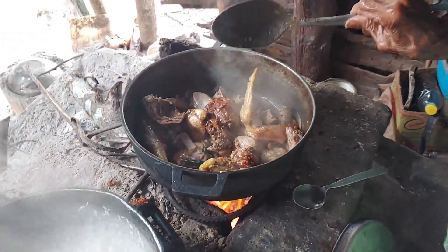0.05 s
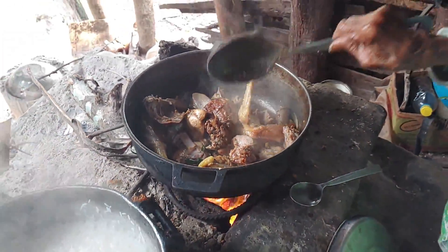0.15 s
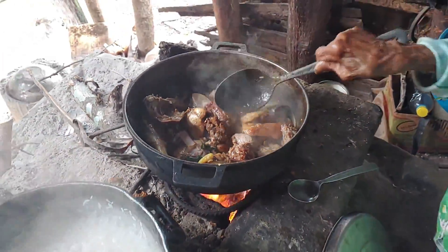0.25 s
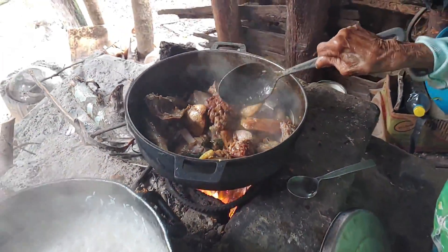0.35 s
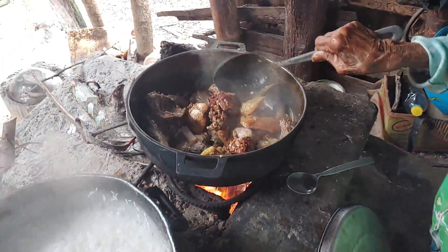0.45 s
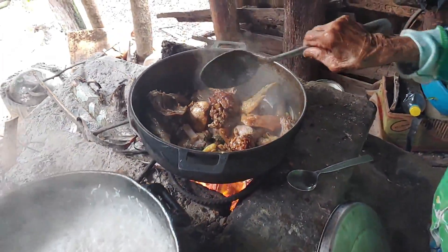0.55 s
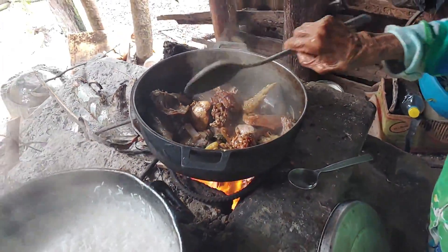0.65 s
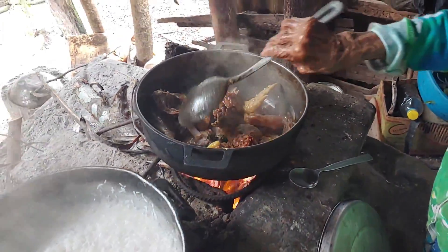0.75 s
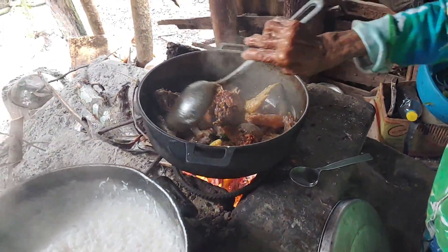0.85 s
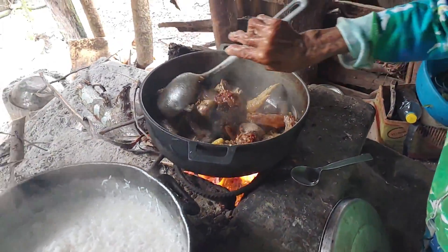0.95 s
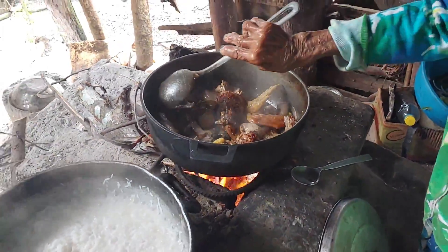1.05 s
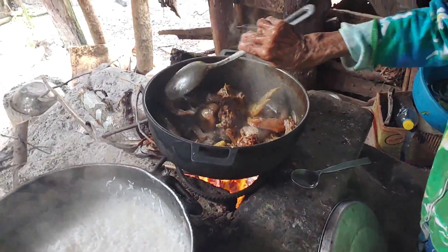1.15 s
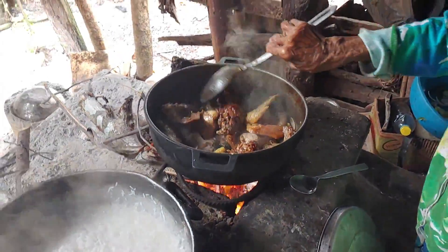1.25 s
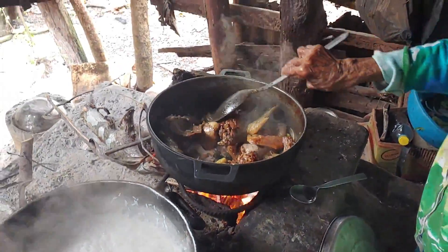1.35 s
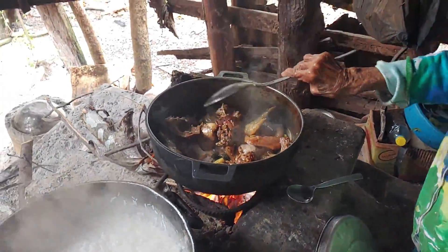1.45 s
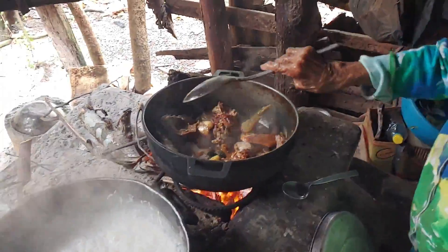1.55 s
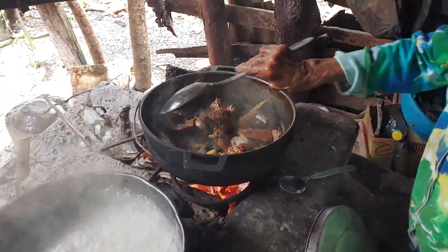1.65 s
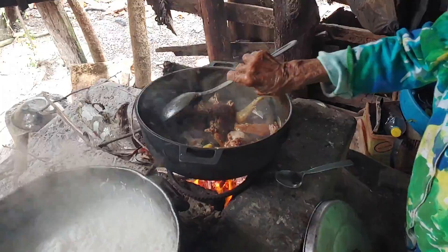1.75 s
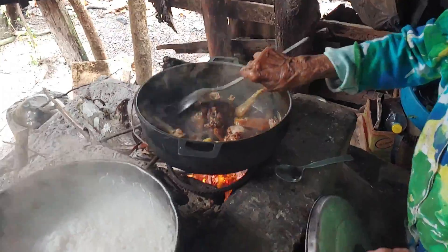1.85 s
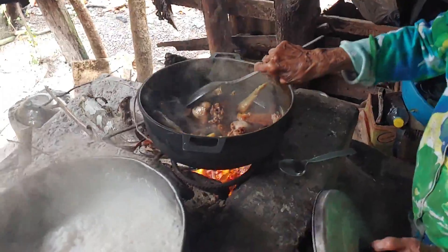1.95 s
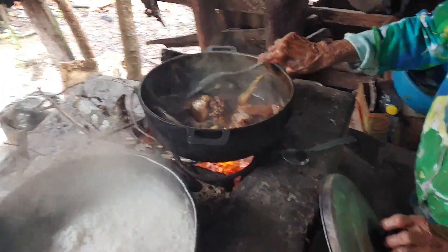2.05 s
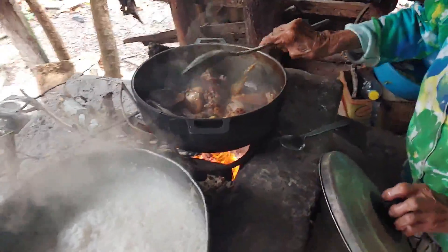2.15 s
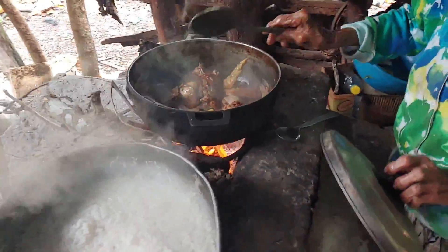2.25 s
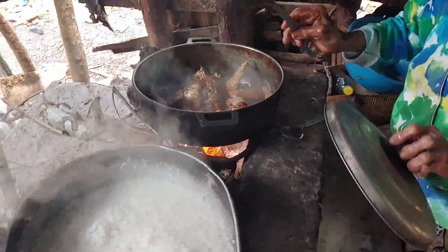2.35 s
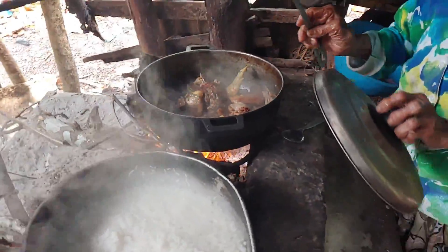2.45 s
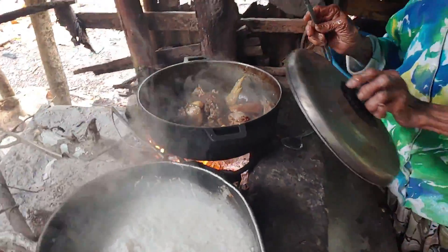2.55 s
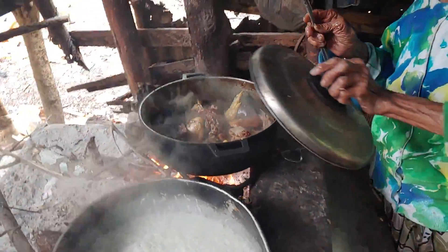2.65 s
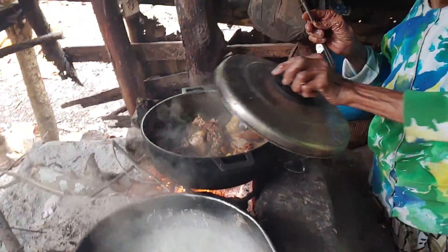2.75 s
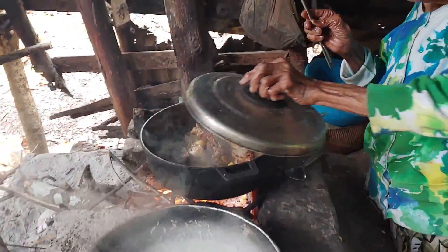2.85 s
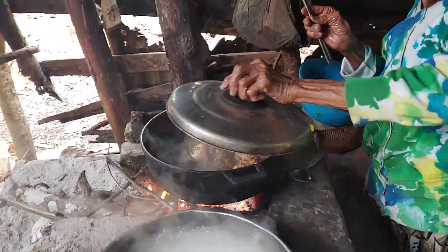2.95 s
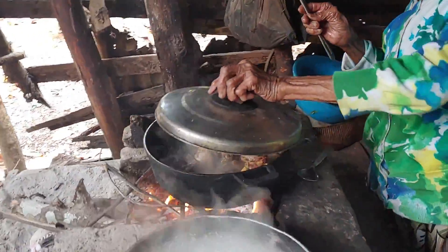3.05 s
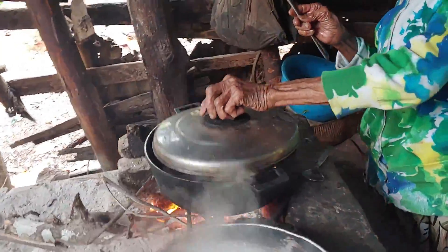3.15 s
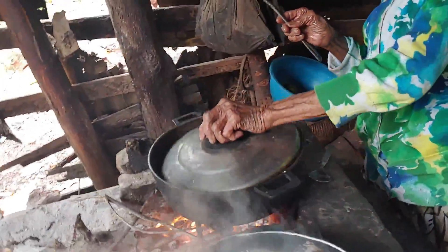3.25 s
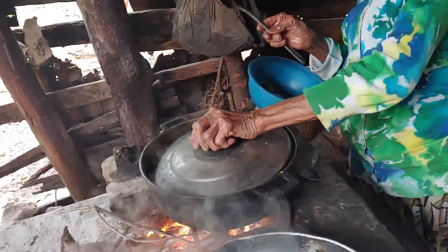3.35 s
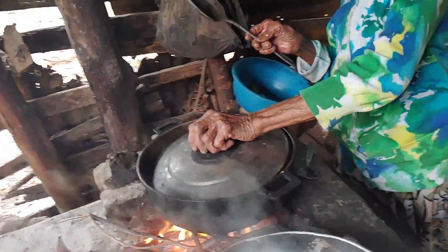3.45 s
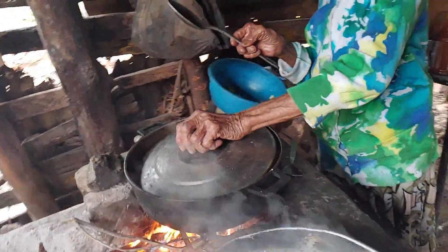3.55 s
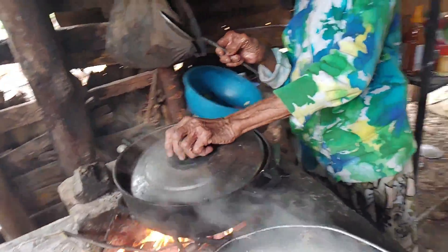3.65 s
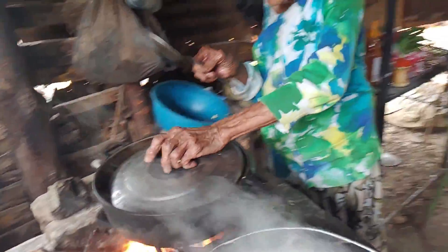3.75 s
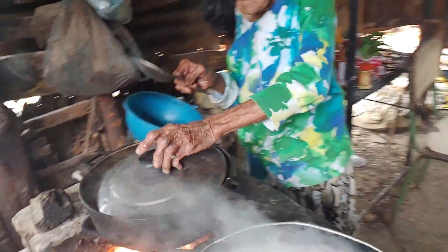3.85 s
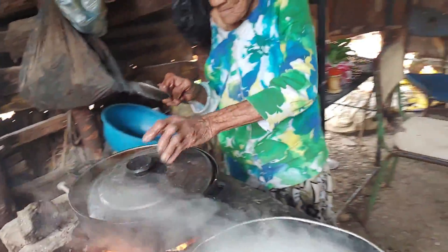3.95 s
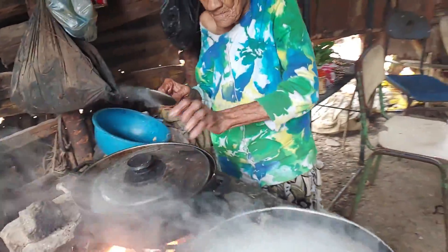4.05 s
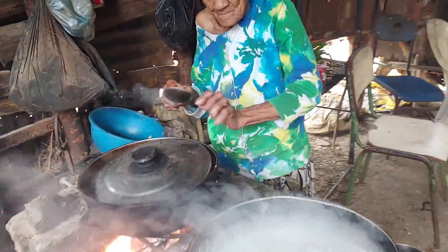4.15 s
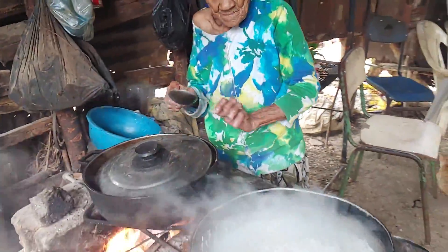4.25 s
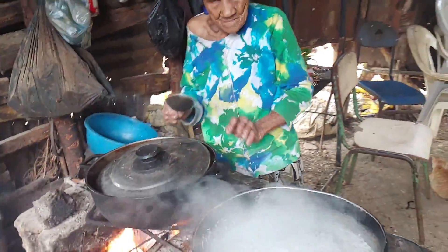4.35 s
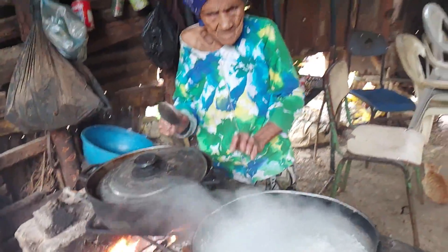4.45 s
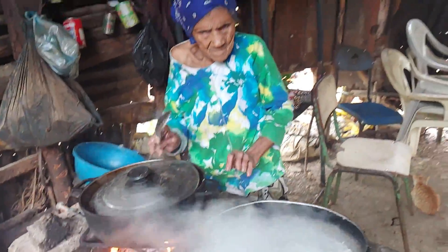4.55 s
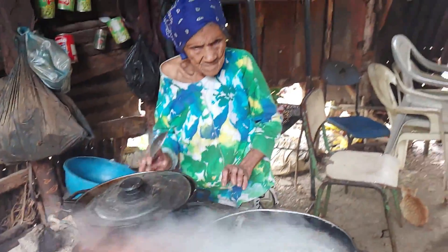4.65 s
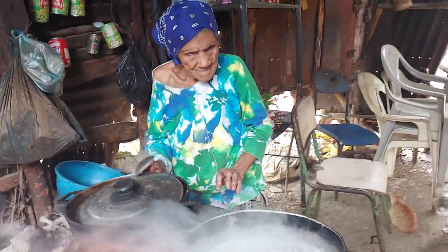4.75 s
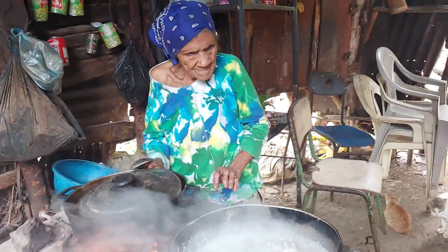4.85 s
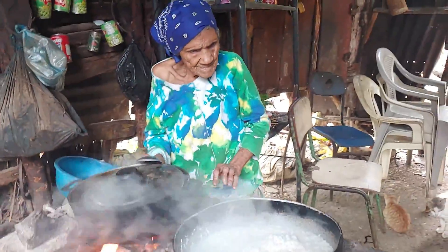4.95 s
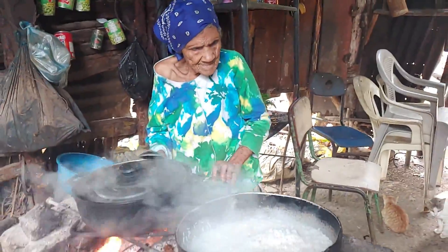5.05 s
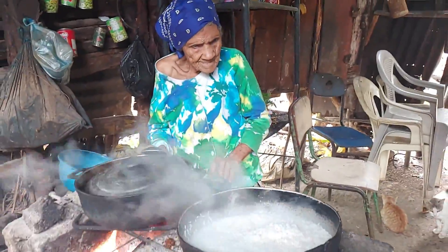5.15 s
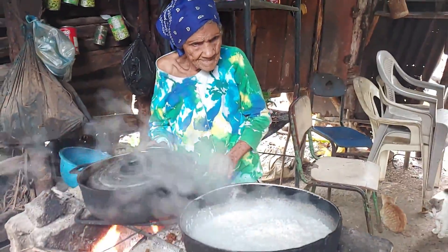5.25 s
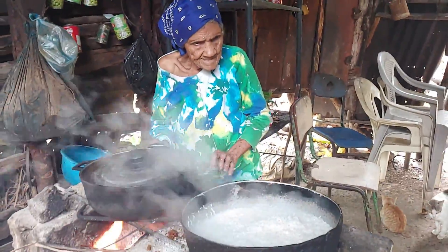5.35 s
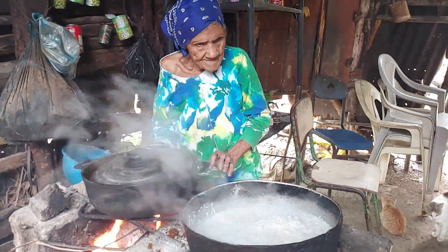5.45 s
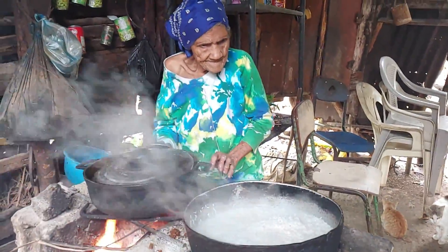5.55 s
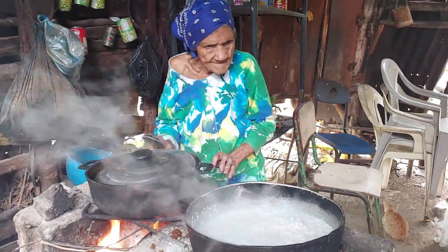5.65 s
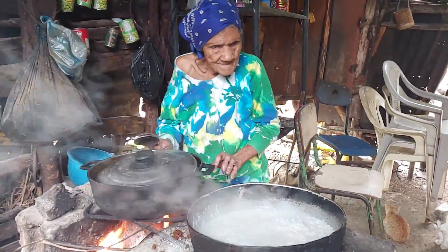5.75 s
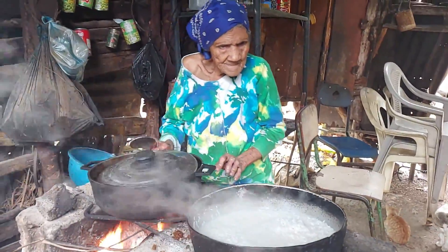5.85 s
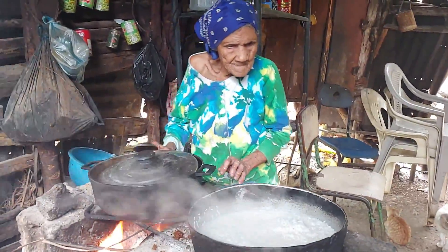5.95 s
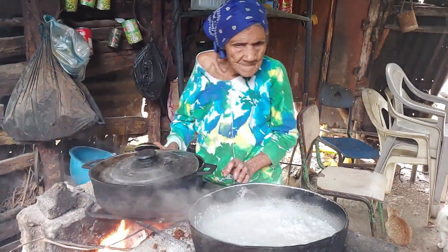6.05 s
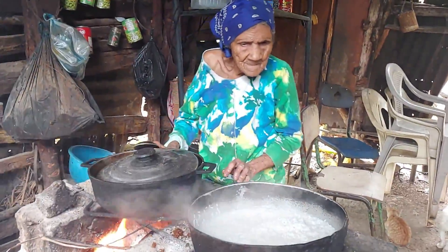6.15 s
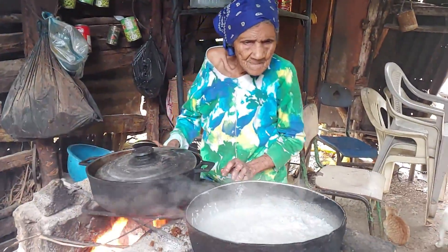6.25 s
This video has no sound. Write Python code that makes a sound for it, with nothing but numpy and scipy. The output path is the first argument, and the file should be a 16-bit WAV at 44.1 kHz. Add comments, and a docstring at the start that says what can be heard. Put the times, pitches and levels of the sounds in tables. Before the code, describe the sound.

A metal spoon taps and scrapes gently in a cast pot, heard up close over quiet frying, a rumbling wood fire and a low hum in an open shed. Halfway through, the lid clatters loudly into place and the sizzle dips slightly. One sharp ringing knock of the spoon follows, then bright clinks, a short juddering scrape and a final clank, as a faint far tone begins.

```python
"""Fat sizzles and a wood fire rumbles and crackles in an open shed, over a low distant hum.
A metal spoon stirs meat in a cast pot with dull taps and light scrapes; the lid drops on and rattles
to rest. The spoon is knocked on the covered pot, put down, slid along and let go with a last clank,
as a faint far tone sets in. Each metal hit is ringing modes and a noisy clatter over a hollow thump;
the sizzle is a stream of tiny bursts, the fire fluttering low noise."""
import sys
import numpy as np
from scipy.fft import rfft, irfft, next_fast_len
from scipy.io import wavfile
from scipy.ndimage import map_coordinates

SR = 44100
rng = np.random.default_rng(int(sys.argv[2]) if len(sys.argv) > 2 else 0)


def unload_audio(sound):
    """Save the sound as a 16-bit wav file, at the path given as the first command line argument."""
    columns = np.transpose(np.atleast_2d(sound))
    # keep every value between -1 and 1, then stretch to whole-number steps
    steps = np.round(np.clip(columns, -1, 1) * 32767)
    wavfile.write(sys.argv[1], SR, steps.astype(np.int16))


N = 278041
TIME = np.arange(N) / SR
RING_TIME = np.arange(SR // 3) / SR  # time axis of one hit

# stereo image, narrow in the bass and wide above: f/Hz, left-right correlation
STEREO_LIKENESS = [(30, 0.87), (120, 0.92), (280, 0.96), (580, 0.49), (1240, 0.35), (3000, -0.34),
                   (6000, 0.18), (9000, -0.014)]
# thump of the hearth under pot and spoon: f/Hz, level/dB, t60/s
HEARTH_MODES = [(210, 2.5, 0.091), (257, 7.5, 0.077), (301, 4, 0.1), (404, -27, 0.064)]


def amp(db):
    """Decibels to gain."""
    return 10 ** (np.asarray(db) / 20)


def unit(x):
    """Scale to rms 1."""
    return x / np.sqrt(np.mean(x ** 2) + 1e-20)


def unit_blow(x):
    """Scale a stereo hit to the energy of 10 ms at rms 1."""
    return x / np.sqrt(np.sum(x ** 2) / (2 * SR / 100))


def pan(db):
    """Stereo gains: left up and right down by db."""
    return amp([[db], [-db]])


def along(points, hz):
    """Read a curve of (f/Hz, value) points on a log frequency axis."""
    freqs, values = np.transpose(points)
    return np.interp(np.log(hz + 1), np.log(freqs), values)


def wobble(rate):
    """A smooth random curve, rate knots a second."""
    return map_coordinates(rng.standard_normal(int(N * rate / SR) + 4), [TIME * rate])


def ramp(start_s, length_s):
    """A linear fade from 0 to 1."""
    return np.clip((TIME - start_s) / length_s, 0, 1)


def swells(rows):
    """Bell-shaped gain envelopes from rows of peak t/s, half length/s, level/dB."""
    return sum(amp(db) * np.exp(-((TIME - s) / length) ** 2) for s, length, db in rows)


def add(out, s, sound):
    """Mix a sound in at s seconds."""
    part = out[:, round(s * SR):][:, :sound.shape[1]]
    part += sound[:, :part.shape[1]]


def coloured(x, level_db):
    """Minimum-phase EQ with the curve level_db(hz): nothing rings ahead of an attack."""
    n = x.shape[-1]
    size = 2 * next_fast_len(n // 2 + 4096)
    gain = amp(level_db(np.fft.rfftfreq(size, 1 / SR)))
    cepstrum = irfft(np.log(gain + 1e-6))
    cepstrum[1:size // 2] *= 2
    cepstrum[size // 2 + 1:] = 0
    return irfft(rfft(x, size) * np.exp(rfft(cepstrum)))[..., :n]


def stereo_angle(hz):
    """Mid-side angle in radians that sets the width at each frequency."""
    return np.arccos(np.clip(along(STEREO_LIKENESS, hz), -1, 1)) / 2


def stereo_noise(n, envelope=1):
    """White noise whose left and right are alike in the bass only."""
    pair = rng.standard_normal((2, n)) * envelope
    size = 2 * next_fast_len(n // 2 + 1)
    angle = stereo_angle(np.fft.rfftfreq(size, 1 / SR))
    mid, side = irfft(rfft(pair, size) * [np.cos(angle), np.sin(angle)])[:, :n]
    return np.array([mid + side, mid - side])


def rush(level_db, grain_db=0):
    """A coloured noise bed of rms 1; grain breaks it into tiny bursts."""
    bursts = amp(grain_db * np.clip(wobble(700), -3, 3))
    return unit(coloured(stereo_noise(N, bursts), level_db))


def sizzle():
    """Fat bursts and spits, flares as wet meat meets hot metal, and is a little quieter under the lid."""
    # spectrum of the frying fat: f/Hz, level/dB
    spectrum = [(1000, -21), (2200, -21.5), (3000, 1), (4200, -1), (5300, -5.5), (6700, -0.5), (7300, -13),
                (8400, -8.5), (9800, -7), (11000, -17), (12500, -32)]
    # the spoon turns the meat: peak t/s, half length/s, level/dB, centre f/Hz, half width/Hz
    flares = [(0.18, 0.075, -60, 4780, 1800), (0.5, 0.055, -57, 6550, 2000),
              (0.859, 0.014, -57, 3500, 1500), (1.221, .02, -57, 9550, 400), (1.93, 0.022, -47, 3400, 3000),
              (1.931, 0.012, -45, 9200, 1500)]
    open_db, lid_cut_db, spits_per_s = -57.5, 1.74, 45
    level_db = open_db - lid_cut_db * ramp(3.4, length_s=0.44) + 0.64 * wobble(4.4)
    colour = lambda hz: along(spectrum, hz)
    spits = (rng.random(N) < spits_per_s / SR) * rng.standard_normal((2, N))
    spitting = amp(-10.5) * unit(coloured(spits, colour))
    out = amp(level_db) * (rush(colour, grain_db=2.0) + spitting)
    for s, length, db, centre_hz, width_hz in flares:
        band = lambda hz: colour(hz) - 20 * np.log10(1 + ((hz - centre_hz) / width_hz) ** 2)
        hiss = unit(coloured(rng.standard_normal((2, len(RING_TIME))), band))
        swell = np.exp(-(RING_TIME / length - 2) ** 2)
        add(out, max(s - 2 * length, 0), amp(db) * hiss * swell)
    return out


def fire():
    """Flames flutter low and surge; the draught and the boiling pot make a soft roar that builds at first."""
    # spectrum that rumble and roar are cut from: f/Hz, level/dB
    spectrum = [(12, -52), (20, -23), (53, -7.5), (81, -8.5), (96, -0.5), (113, 8.5), (174, -15.5),
                (200, -16), (340, -18), (439, -19), (1060, -22.5), (2200, -33), (2860, -33.5), (4840, -120)]
    # the flames surge: peak t/s, half length/s, level/dB
    surges = [(1.27, 0.26, -53), (4.42, .15, -56)]
    rumble_eq = [(85, 12.5), (125, -19.5), (250, -31.5)]  # f/Hz, gain/dB
    roar_eq = [(100, -25.5), (160, 0.0)]
    rumble_db = -49.5
    roar_db = -46 - 3.5 * (1 - ramp(0, length_s=0.98))
    rumble = rush(lambda hz: along(spectrum, hz) + along(rumble_eq, hz))
    roar = rush(lambda hz: along(spectrum, hz) + along(roar_eq, hz), grain_db=1.0)
    flutter, waver = amp(.9 * wobble(7)), amp(.8 * wobble(9))
    flames = (amp(rumble_db) + swells(surges)) * flutter * rumble * pan(-.8)
    return flames + amp(roar_db) * waver * roar


def crackle():
    """Sparse, faint ticks from the burning wood."""
    # spectrum of a tick: f/Hz, level/dB
    spectrum = [(200, -23), (700, -2), (1600, 3.5), (4000, -18), (10000, -26)]
    ticks_per_s, level_db = 7, -67
    ticks = (rng.random(N) < ticks_per_s / SR) * rng.uniform(.4, 1, (2, N))
    return amp(level_db) * unit(coloured(ticks, lambda hz: along(spectrum, hz)))


def hum():
    """A low hum creeps up in pitch and settles in level; near the end a wavering far tone joins it."""
    # partials of the far tone: f/Hz, level/dB
    partials = [(268, -2), (560, -8.5), (798, -6)]
    start_hz, rise_hz_per_s = 109.2, 1.15
    loud_db, steady_db, far_db = -43, -50.5, -49
    pitch_hz = start_hz + rise_hz_per_s * TIME
    level_db = loud_db + (steady_db - loud_db) * ramp(0.76, length_s=0.95)
    tone = lambda hz: np.sqrt(2) * np.sin(2 * np.pi * np.cumsum(hz) / SR)
    low = amp(level_db + 1.15 * wobble(6.8)) * tone(pitch_hz + 0.667 * wobble(12))
    far = sum(amp(db + 1.2 * wobble(30)) * tone(hz + 4 * wobble(40)) for hz, db in partials)
    return low * pan(-.5) + amp(far_db) * ramp(6.08, length_s=.1) * far


def slips(resonances):
    """Tiny slips of an edge excite damped metal resonances, at rms 1."""
    def power(hz):
        return sum(amp(db) ** 2 / (1 + ((hz - centre) / width) ** 2) for centre, width, db in resonances)
    return rush(lambda hz: 10 * np.log10(power(hz)), grain_db=3)


def scrapes():
    """The spoon grazes the pot wall while stirring; later its edge sings as it is slid along."""
    # strokes of stirring and of sliding: peak t/s, half length/s, level/dB
    stirs = [(.18, 0.055, -57.5), (.48, .05, -55), (1.89, .06, -60.5)]
    slides = [(5.353, 0.055, -46), (5.486, 0.026, -48.5), (5.69, .02, -53)]
    # metal resonances that each excites: f/Hz, half width/Hz, level/dB
    stir_resonances = [(3500, 40, 0), (4100, 32, -3), (4660, 30, -4), (5280, 30, 0), (6260, 50, -1),
                       (6640, 50, 1)]
    slide_resonances = [(1075, 25, 0), (1290, 19, 4), (1500, 31, 1), (2340, 70, -4), (3104, 35, 6.5),
                        (3830, 60, -4), (4400, 60, -3), (5170, 73, -8), (6170, 51, -5)]
    return slips(slide_resonances) * swells(slides) + slips(stir_resonances) * swells(stirs)


def taps():
    """Contacts damped by food and hand: a click and a short noise burst through one resonance."""
    # dull knocks of stirring and handling: t/s, level/dB, centre f/Hz, sharpness, t60/s
    contacts = [(0.302, -43.5, 398, 2.8, 0.07), (.302, -46, 1050, 3.9, 0.058), (.428, -46.5, 1700, 2, .2),
                (1.315, -44.5, 1210, 3, 0.035), (1.771, -36, 1040, 3.3, 0.06), (1.772, -41, 1710, 3, .07),
                (1.821, -35.5, 990, 3.5, 0.14), (1.885, -29.5, 86, 1.7, 0.32),
                (1.935, -42, 1300, 1.2, 0.16), (2.112, -29, 174, 2.5, 0.12), (3.773, -44, 690, 3.6, 0.064),
                (4.9117, -31, 1310, 16, 0.17), (4.913, -43, 2415, 28, 0.19), (5.484, -42, 1190, 4.7, 0.17),
                (5.672, -38.5, 1090, 5.2, 0.12)]
    out = np.zeros((2, N))
    for s, db, centre_hz, sharpness, t60 in contacts:
        burst = stereo_noise(len(RING_TIME)) * amp(-60 * RING_TIME / t60)
        burst[:, 0] += 8  # the first touch arrives as one click
        detune = lambda hz: (hz + 1) / centre_hz - centre_hz / (hz + 1)
        resonance = lambda hz: -20 * np.log10(1 + (sharpness * detune(hz) / 2) ** 2)
        add(out, s, amp(db) * unit_blow(coloured(burst, resonance)))
    return out


def ring(modes, scatter_db=2):
    """Each hit excites the modes in a new balance; the higher ones reach the two ears out of step."""
    hz, db, t60 = np.transpose(modes)[:, :, None]
    side_draw, level_draw, phase_draw = rng.standard_normal((3, len(modes), 1))
    ear_shift = stereo_angle(hz) * np.sign(side_draw)
    attack = 1 - np.exp(-RING_TIME / .0001)
    envelope = attack * amp(db + scatter_db * level_draw - 60 * RING_TIME / t60)
    phase = 2 * np.pi * hz * RING_TIME + phase_draw * np.minimum(hz / 1000, np.pi)
    ears = [np.sum(envelope * np.sin(phase + side * ear_shift), axis=0) for side in (1, -1)]
    return unit_blow(np.array(ears))


def clatter(spectrum, crack_t60, tail_t60, tail_db):
    """Noise between the modes: a sharp crack, then the dense tail of metal and shed."""
    envelope = amp(-60 * RING_TIME / crack_t60) + amp(tail_db - 60 * RING_TIME / tail_t60)
    burst = stereo_noise(len(RING_TIME)) * envelope
    return unit_blow(coloured(burst, lambda hz: along(spectrum, hz)))


def tilt(x, db_per_khz):
    """Tilt the treble: up for a harder contact, down for a softer one."""
    return coloured(x, lambda hz: db_per_khz * (np.clip(hz, 1500, 10000) - 1500) / 1000)


def strike(hits, modes, spectrum, thump_modes, ring_db, clatter_db, pan_db, **clatter_shape):
    """Struck metal rings and clatters over a hollow thump."""
    out = np.zeros((2, N))
    for s, metal_db, thump_db, db_per_khz in hits:
        tones, thump = ring(modes), ring(thump_modes)
        metal = amp(ring_db) * tones + amp(clatter_db) * clatter(spectrum, **clatter_shape)
        metal = tilt(metal, db_per_khz)
        add(out, s, amp(metal_db) * metal * pan(pan_db) + amp(thump_db) * thump * pan(-1.1))
    return out


def lid():
    """The lid hits the rim, tips over and chatters into its seat, rocking the whole pot."""
    # the lid lands: t/s, metal level/dB, thump level/dB, treble tilt/(dB per kHz)
    hits = [(3.1745, -15.5, -37, 0.15), (3.1802, -20.5, -46, 0), (3.2145, -20.5, -33, -1.5),
            (3.2695, -14.5, -13.5, -0.14), (3.2725, -17.5, -25.5, 0), (3.284, -33, -40, 1.5),
            (3.3205, -24, -28, 1), (3.339, -21.5, -28.5, -1)]
    # ring of the lid and thump of the rocking pot: f/Hz, level/dB, t60/s
    modes = [(318, -9, .32), (403, -3.5, .2), (436, -10, .17), (479, -6, .25), (678, -6, .22),
             (965, -1, .17), (1190, 3, .21), (1281, -1.5, .4), (1351, -2, .22), (1400, 0, .23),
             (1480, -6, .2), (1632, -6, .17), (1679, -2, .22), (1759, -1.5, .22), (1803, -9, .17),
             (1860, -10, .17), (2040, -14, .38), (2350, -15, .18), (2620, 0, .05), (3150, -2, .045),
             (2826, -14, .15), (2907, -13, .18), (3040, -9, .17), (3430, -10, .16), (3780, -18, .18),
             (4800, -16, .08), (6650, -18, .08), (6794, -24, .2)]
    rock_modes = [(191, -6.5, 0.052), (306, 5, 0.015), (408, 0, 0.037)]
    # spectrum of the lid's clatter: f/Hz, level/dB
    spectrum = [(100, -34), (300, -8.5), (430, 3), (560, -1), (1000, 1.5), (1700, -0.5), (2200, -10.5),
                (3100, -15), (4200, -21.5), (6500, -28.5), (10000, -32.5), (12500, -55)]
    out = strike(hits, modes, spectrum, rock_modes, ring_db=1.5, clatter_db=1.7, pan_db=-0.5,
                 crack_t60=0.038, tail_t60=0.19, tail_db=-11)
    rattle_times = np.linspace(3.298, 3.386, num=9) + rng.normal(0, .002, size=9)
    for s in rattle_times:
        tones, thump = ring(modes, scatter_db=4), ring(rock_modes)
        chatter = clatter(spectrum, crack_t60=0.067, tail_t60=0.18, tail_db=-3)
        contact = amp(2.5) * tones + amp(1.0) * chatter + amp(-4) * thump
        add(out, s, amp(-29.5) * tilt(contact, db_per_khz=0.26))
    return out


def pot_knock():
    """One hard knock of the spoon rings the covered pot; small rebounds follow."""
    # knock and rebounds: t/s, metal level/dB, thump level/dB, treble tilt/(dB per kHz)
    hits = [(4.8056, -10, -19.5, 0.26), (4.8095, -23, -17, -0.5), (4.871, -51, -25, -6),
            (4.9125, -37, -31, -1), (4.93, -43, -28.5, -1)]
    # ring of the covered pot: f/Hz, level/dB, t60/s
    modes = [(404, -2, .2), (480, -9, .18), (690, -4, .15), (790, -3, .13), (942, -2, .13), (1094, -9, .2),
             (1303, 1, .24), (1398, -2, .2), (1486, -3, .17), (1599, -6, .17), (1700, -5, .15),
             (1771, -2.5, .15), (2019, -6, .18), (2200, -14, .14), (2697, -8, .11), (2815, -12, .15),
             (3262, -6.5, .17), (3490, -13, .17), (3693, -11, .2), (4140, -19, .2), (4619, -15, .11),
             (4850, -14, .09), (6056, -16, .13), (6406, -14, .15), (9100, -15, .13)]
    # spectrum of the pot's clatter: f/Hz, level/dB
    spectrum = [(100, -52), (400, -5), (800, 6), (1600, 1.5), (2200, -13.5), (3400, -8), (5000, -21),
                (6500, -20.5), (7800, -26), (9500, -20), (12500, -43)]
    return strike(hits, modes, spectrum, HEARTH_MODES, ring_db=-1.4, clatter_db=-2.0, pan_db=-0.1,
                  crack_t60=0.0075, tail_t60=0.19, tail_db=4)


def spoon_clinks():
    """The spoon bounces and rings brightly as it is put down."""
    # bounces: t/s, metal level/dB, thump level/dB, treble tilt/(dB per kHz)
    hits = [(4.978, -18, -20.5, 0.23), (4.987, -19.5, -23.5, -1.2), (5.006, -22, -39.5, -1),
            (5.019, -44, -27, -2)]
    # ring of the spoon: f/Hz, level/dB, t60/s
    modes = [(1279, -7, .28), (2005, -13, .19), (3025, -9, .17), (3203, -13, .13), (3750, -6, .15),
             (4375, -15, .14), (6038, -2.5, .125), (6275, -11, .14), (6560, -13, .2), (8478, 1.5, .065),
             (8586, -4, .07), (10120, -17, .15), (11080, -15, .1)]
    # spectrum of the spoon's clatter: f/Hz, level/dB
    spectrum = [(100, -19), (420, -4.5), (1300, -1.5), (1800, -8), (3300, -3), (5200, -9), (6300, 1),
                (7600, -25), (8600, -5), (10000, -19), (12500, -27)]
    return strike(hits, modes, spectrum, HEARTH_MODES, ring_db=-3.2, clatter_db=-3.0, pan_db=0.1,
                  crack_t60=0.026, tail_t60=0.15, tail_db=20)


def hearth_judder():
    """Each push of the sliding spoon makes the hearth judder."""
    # pushes: peak t/s, half length/s, level/dB
    pushes = [(5.34, 0.087, -31), (5.485, 0.029, -33), (5.68, 0.043, -39)]
    # spectrum of the judder: f/Hz, level/dB
    spectrum = [(100, -41), (200, 1.5), (275, 8), (330, -0.5), (420, -17.5), (1100, -18), (2000, -34),
                (6200, -50), (9000, -38), (12000, -68)]
    return swells(pushes) * rush(lambda hz: along(spectrum, hz), grain_db=-0.5)


def plate_clanks():
    """The spoon's handle touches the iron stove plate twice, then clanks onto it when let go."""
    # handle contacts: t/s, metal level/dB, thump level/dB, treble tilt/(dB per kHz)
    hits = [(5.481, -52, -40, -2), (5.674, -50, -39, -0.5), (6.0507, -24.5, -24, -1),
            (6.058, -24, -27.5, 0.5), (6.065, -22, -19, 0), (6.083, -37, -24, -3)]
    # ring of handle on plate: f/Hz, level/dB, t60/s
    modes = [(746, -2, 0.054), (925, 0.5, .15), (1090, -6, 0.15), (1280, -6, 0.14), (1505, -11, 0.19),
             (2306, -4.5, 0.14), (2945, -7, 0.12), (3003, 1, 0.13), (3874, -3, 0.1), (4350, -9, .1),
             (5290, -25, .14), (6110, -4, 0.086), (6074, -1.5, 0.067), (6825, -7, 0.1), (7780, -15, 0.091),
             (8600, -16, 0.11), (9160, -11, 0.082), (9900, -18, .15)]
    # spectrum of their clatter: f/Hz, level/dB
    spectrum = [(100, -17), (500, -6), (1000, 2), (1400, -2.5), (1850, -7.5), (2350, 2.5), (4400, -4),
                (6000, -1.5), (7000, -13), (7500, -17), (9200, -16), (12500, -24)]
    return strike(hits, modes, spectrum, HEARTH_MODES, ring_db=-2.0, clatter_db=-4.0, pan_db=0.1,
                  crack_t60=0.035, tail_t60=0.17, tail_db=10)


def scene():
    """Cookware up front, over a bed of sizzle, fire and hum."""
    # how well the cookware radiates: f/Hz, gain/dB
    radiation = [(80, -51), (135, -19), (190, -2.5), (10500, 0.5), (12500, -5)]
    handling = lid() + pot_knock() + spoon_clinks() + plate_clanks() + hearth_judder() + scrapes()
    cookware = coloured(handling, lambda hz: along(radiation, hz))
    return cookware + taps() + sizzle() + fire() + crackle() + hum()


def record(dry):
    """Soft-clip the highest peaks, let the left side lead slightly and cut the top treble."""
    ceiling, left_lead_s, top_hz = .9, .00011, 12683
    rounded = dry / (1 + np.abs(dry / ceiling) ** 6) ** (1 / 6)
    size = next_fast_len(N + SR // 2)
    hz = np.fft.rfftfreq(size, 1 / SR)
    time_shift = np.exp(1j * np.pi * hz * left_lead_s * np.array([[1], [-1]]))
    return irfft(rfft(rounded, size) * time_shift * (hz < top_hz), size)[:, :N]


dry = scene()
out = record(dry)
unload_audio(out)
```